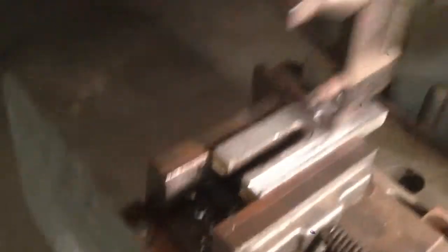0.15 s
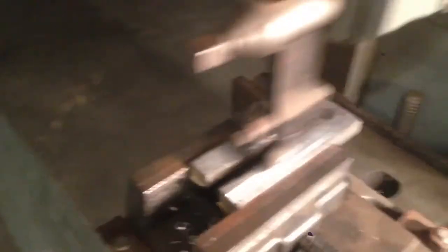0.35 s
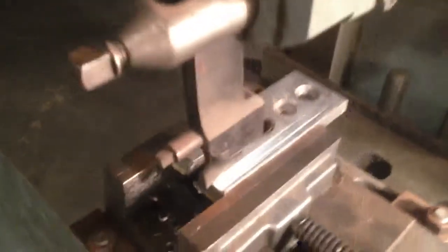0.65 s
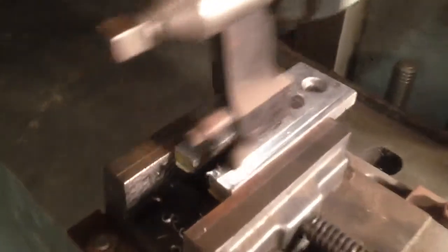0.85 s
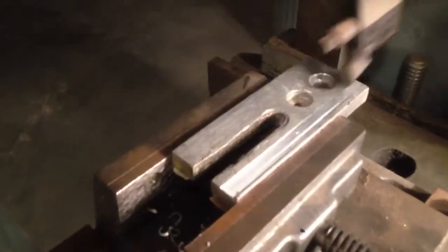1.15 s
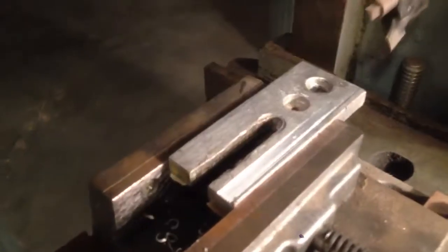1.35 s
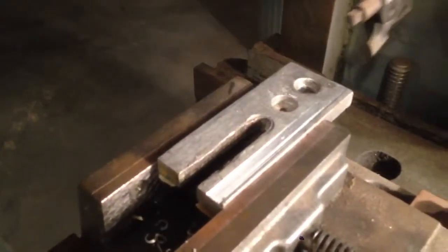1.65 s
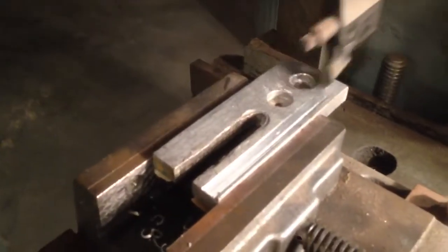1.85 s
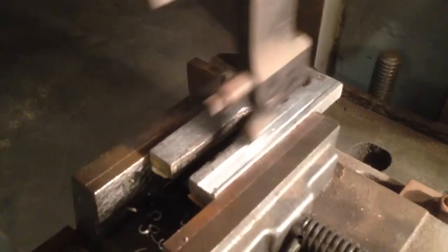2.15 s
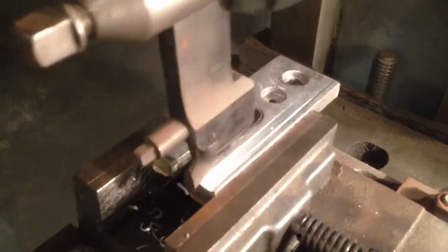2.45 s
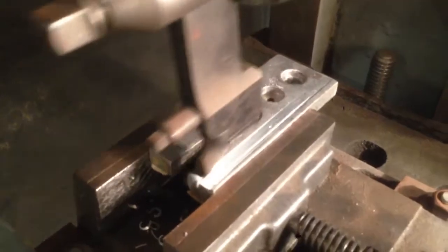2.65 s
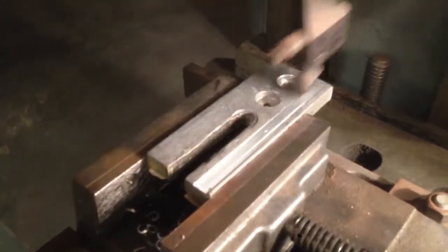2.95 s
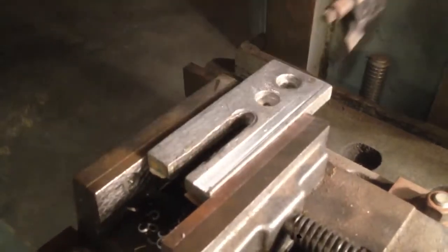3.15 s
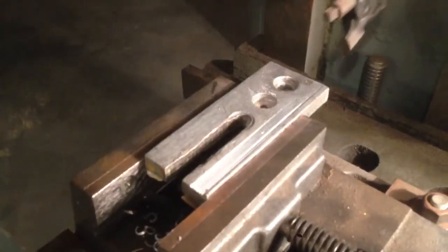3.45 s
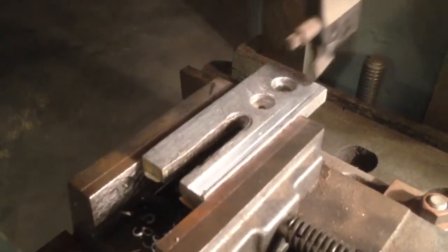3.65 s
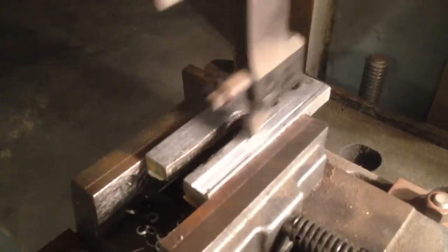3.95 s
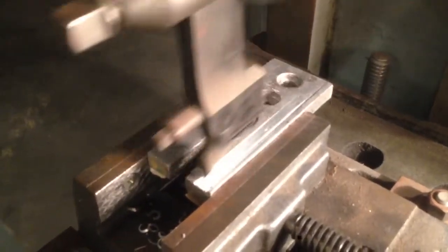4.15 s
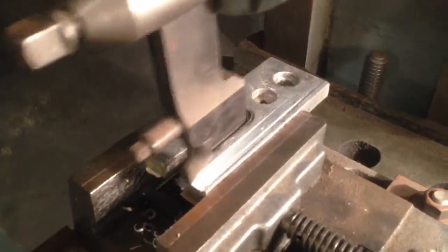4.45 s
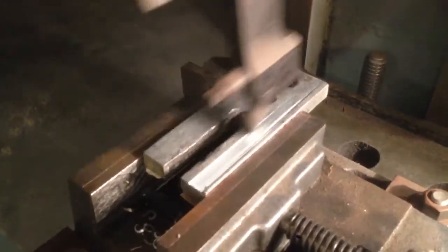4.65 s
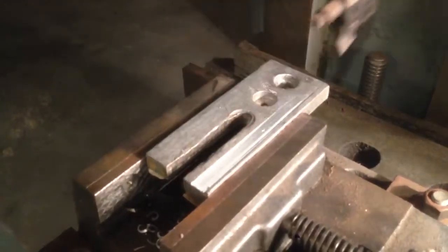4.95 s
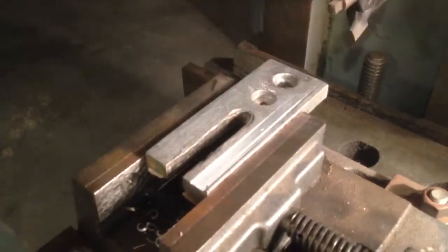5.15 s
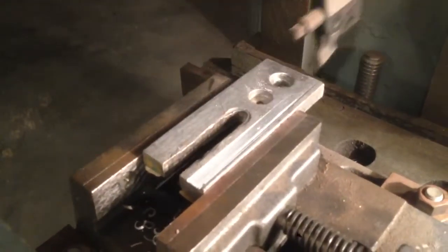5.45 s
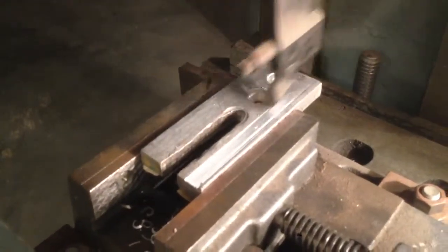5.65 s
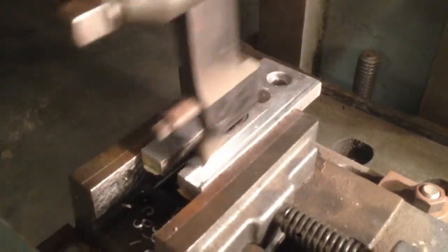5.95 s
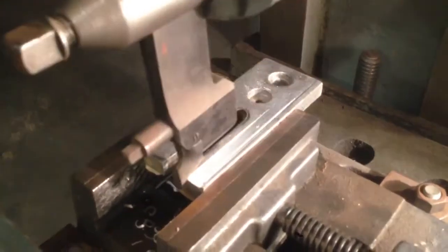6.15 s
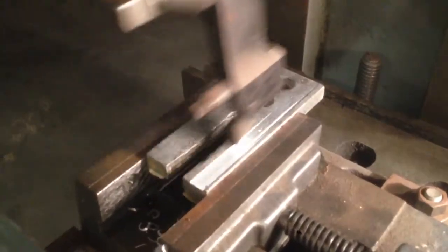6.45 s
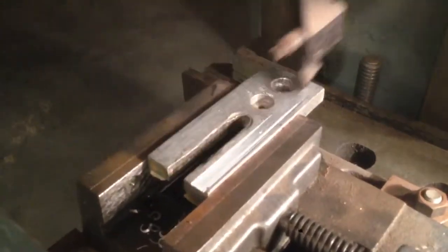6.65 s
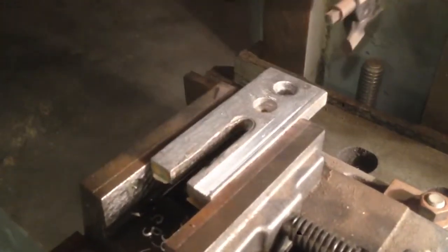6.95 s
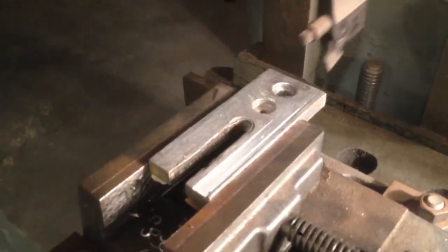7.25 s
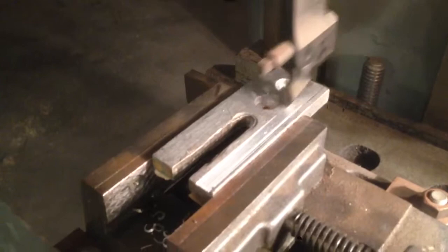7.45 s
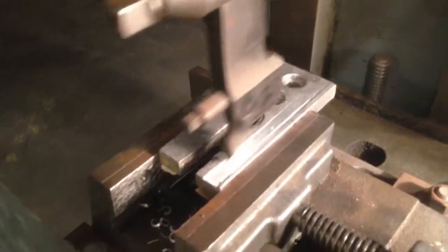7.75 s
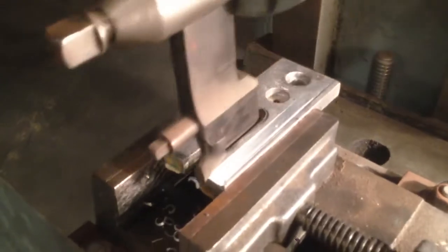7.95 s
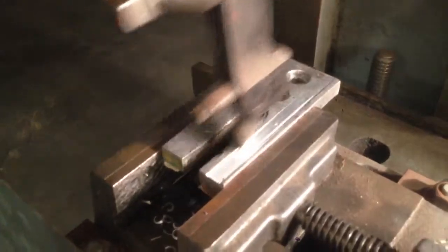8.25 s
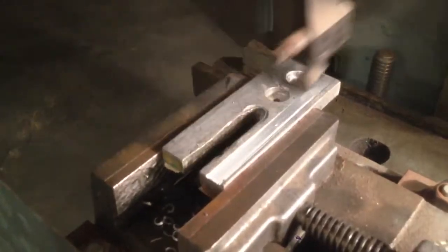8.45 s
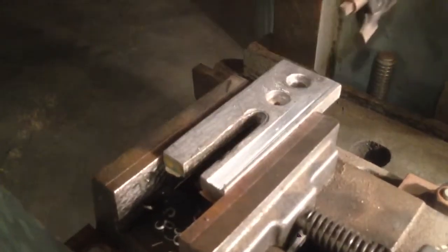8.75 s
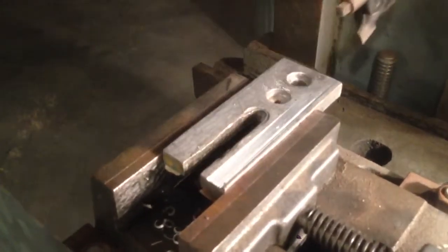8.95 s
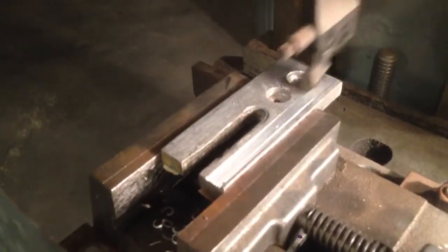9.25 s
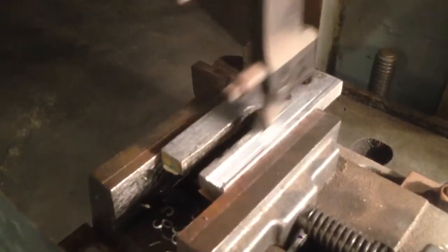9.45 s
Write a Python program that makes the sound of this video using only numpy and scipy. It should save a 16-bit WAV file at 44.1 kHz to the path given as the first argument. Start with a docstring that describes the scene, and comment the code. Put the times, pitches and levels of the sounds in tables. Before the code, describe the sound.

Close to a small metal shaper in a workshop, a motor whirs faintly beneath uneven gear rumble. Every stroke, just under two seconds, begins with a hard bright clack; a second clack follows quickly with a low thud as the tool bites. The cut grates and sings briefly, the tool springs free, then the ram slides back with a soft hiss and loose metallic knocks. Short room echoes follow the blows.

```python
"""A small metal shaper strokes to and fro in a workshop, over motor hum and gear rumble in filtered noise.
Each stroke opens with a clack of the feed pawl, made of struck modes; the linkage knocks and the slides hiss.
The tool bites with a low modal thud and sings through the cut in resonant noise while the pawl clacks again.
It springs free and drags back with a hiss of noise, while slack in the linkage knocks the cast frame.
Now and then gears thump, loose parts knock and chips tick; sparse echoes of the shop follow the blows."""
import sys
import numpy as np
from scipy import signal
from scipy.io import wavfile
from scipy.ndimage import uniform_filter1d

SR = 44100
rng = np.random.default_rng(int(sys.argv[2]) if len(sys.argv) > 2 else 0)


def wrap_up_sound(samples):
    """Save the sound to the file named by the first command line argument, as 16-bit audio."""
    columns = np.atleast_2d(samples).T
    # keep every value between -1 and 1, then stretch to whole-number steps
    tamed = np.clip(columns, -1, 1)
    steps = np.round(tamed * 32767).astype(np.int16)
    wavfile.write(sys.argv[1], SR, steps)


N = 422919
STROKE_S, FIRST_S = 1.8374, .0805  # one turn of the crank; start of the first forward stroke


def amp(db):
    """Level in decibels to amplitude ratio."""
    return 10 ** (np.asarray(db) / 20)


def evened(x):
    """Normalisation to unit rms."""
    return x / np.sqrt(np.mean(x ** 2) + 1e-20)


def read(points, hz):
    """Interpolation along a logarithmic frequency axis."""
    f, value = np.transpose(points)
    return np.interp(np.log(hz + 1), np.log(f + 1), value)


def band(x, lo_hz, hi_hz):
    """Band-pass filtering by a Butterworth response."""
    edges = [lo_hz, min(hi_hz, SR / 2 - 1000)]
    return signal.sosfilt(signal.butter(2, edges, "band", fs=SR, output="sos"), x)


def add(mix, s, sound):
    """Superposition of a sound upon the mix from time s."""
    part = mix[round(s * SR):][:len(sound)]
    part += sound[:len(part)]


def ring(modes, rise=0.000093):
    """Modal decay: dying sines of a struck part, neighbours in opposite sense, peak 1."""
    t = np.arange(4000) / SR
    out = 0
    for k, (hz, db, t60) in enumerate(modes):
        out = out + (-1) ** k * amp(db - 60 * t / t60) * np.sin(2 * np.pi * hz * t)
    out = out * (1 - np.exp(-t / rise))
    return out / abs(out).max()


def humps(peaks, hz):
    """Energy sum of resonance curves, in dB."""
    return 10 * np.log10(sum(amp(2 * db) / (1 + (2 * (hz - f) / w) ** 2) for f, w, db in peaks))


def noise(shape_db, patchy_db, size=1024, count=513):
    """Spectral shaping: random bins (the lowest count) follow shape_db(Hz) in drifting patches, rms 1."""
    hz = np.fft.rfftfreq(size, 1 / SR)[:count]
    a, b, patches = rng.standard_normal((4 * N // size + 5, count, 3)).T
    patches = uniform_filter1d(patches, size=6, axis=0)
    patches = evened(uniform_filter1d(patches, size=5, axis=1))
    z = (a + 1j * b) * amp(shape_db(hz)[:, None] + patchy_db * patches)
    z = np.pad(z, ((0, size // 2 + 1 - count), (0, 0)))
    return evened(signal.istft(z, nperseg=size, noverlap=3 * size // 4)[1][:N])


def wander(db, size):
    """Random amplitude modulation: smoothed noise as a gain, db being its rms swing."""
    return amp(db * evened(uniform_filter1d(rng.standard_normal(N), size=size)))


def into_stroke():
    """Periodic motion of the crank: seconds since the current stroke began."""
    return (np.arange(N) / SR - FIRST_S) % STROKE_S


def strokes(tables, edge_s):
    """Periodic gating: the gain follows each table in every stroke, off between them, with soft edges."""
    t = into_stroke()
    gain = 0
    for rows in tables:
        inside = (t > rows[0][0]) * (t < rows[-1][0])
        gain = gain + amp(np.interp(t, *np.transpose(rows))) * inside
    return uniform_filter1d(gain, size=round(edge_s * SR) + 1, mode="nearest")


def motor():
    """Tonal hum and broadband flow noise: mains hum that barely wavers, over the whir of fan and belt."""
    # mains hum: f/Hz, relative level/dB
    hum_lines = [(120.1, -68.5)]
    # spectrum of the whir: f/Hz, relative level/dB per Hz
    air_spectrum = [(290, -46), (500, 3.5), (648, -22), (717, 5), (770, -12), (942, -16), (1090, -4.5),
                    (1310, -7), (1990, -25), (3590, -17), (15600, -23)]
    t = np.arange(N) / SR
    hum = sum(amp(db + 2.5) * np.sin(2 * np.pi * hz * t) for hz, db in hum_lines)
    whir = amp(-61.5) * noise(lambda hz: read(air_spectrum, hz), 0.64)
    return wander(0.97, 3000) * hum + whir


def running_gear():
    """Load-modulated noise: gear rumble, the ringing gear case and the rustling slides follow the stroke."""
    # one stroke, forward and back: t/s into it, gear rumble/dB, ringing of the gear case/dB, slide rustle/dB
    stroke_levels = [(0, -61, -54.5, -68), (.05, -61, -53.5, -53), (.13, -58.5, -60, -55.5),
                     (.2, -58, -60, -56.5), (.23, -58, -48, -51), (.33, -56.5, -51, -56.5),
                     (.4, -56.5, -54.5, -54), (.52, -54, -49.5, -58), (.59, -56.5, -55.5, -63.5),
                     (.65, -57.5, -53.5, -64.5), (.8, -57, -50.5, -58), (.9, -58, -60, -61),
                     (1.13, -58.5, -59, -66), (1.17, -58.5, -48.5, -58), (1.23, -56.5, -56.5, -67),
                     (1.36, -61, -54.5, -64.5), (1.47, -64, -55, -66), (1.52, -61.5, -50, -56),
                     (1.6, -57, -53, -62), (1.67, -61.5, -59, -65.5), (1.8, -61, -61, -64.5)]
    # gear spectrum: f/Hz, relative level/dB per Hz
    gear_spectrum = [(30, -46), (80, -49), (135, -8), (190, -0.5), (240, -2.5), (310, -1), (400, -21.5),
                     (560, -9.5), (740, -8.5), (1000, -16.5), (1500, -46)]
    # gear case resonances: f/Hz, width/Hz, relative level/dB, before the sharpening below
    case_modes = [(397, 27, 0.5), (328.3, 61, -3.5), (456, 110, -4)]
    # slide spectrum: f/Hz, relative level/dB per Hz
    slide_spectrum = [(820, -8.5), (1400, -5.5), (1700, 1), (1810, -1.5), (1950, -2.5), (2220, -4),
                      (2420, -5.5), (2840, -5.5), (3090, -9.5), (3530, -7), (4350, -11.5), (5030, -18),
                      (6000, -18), (7800, -58), (13200, -120)]
    s, *levels = np.transpose(stroke_levels)
    gear, case, slide = (amp(np.interp(into_stroke(), s, db, period=STROKE_S)) for db in levels)
    teeth = wander(2.3, 900)  # uneven load, tooth by tooth
    surge = wander(2, 3500)  # the gear case swells unevenly
    rumble = noise(lambda hz: read(gear_spectrum, hz), 1.8, size=2048, count=90)
    ringing = noise(lambda hz: 2 * humps(case_modes, hz), 0.99, size=2048, count=60)
    rustle = noise(lambda hz: read(slide_spectrum, hz), 3.0, count=200)
    return gear * teeth * rumble + case * teeth * surge * ringing + slide * teeth ** 0.74 * rustle


def pawl():
    """Impact excitation: scrape, tick of slip-off, landing in two contacts, rebound; apart, gritty crack."""
    # feed pawl: t/s of the tick, bright tick level/dB, blow level/dB
    clack_times = [(0.08, -19.5, -13), (0.368, -22, -12.5), (1.9177, -19.5, -10.5), (2.2047, -18, -11),
                   (3.7524, -18, -12), (4.0387, -18, -12), (5.5921, -18, -11), (5.881, -16.5, -11.5),
                   (7.4268, -16, -10.5), (7.7122, -17.5, -12), (9.2694, -17, -11.5), (9.5537, -17.5, -12)]
    # modes struck by the blow: f/Hz, relative level/dB, t60/s
    pawl_modes = [(796, -15, 0.04), (1020, -12, 0.07), (1340, -7.5, 0.023), (1729, -9, 0.052),
                  (1920, -17.5, 0.068), (2370, -6.5, 0.029), (2757, -0.5, 0.027), (2853, -6.5, 0.051),
                  (3498, 10, 0.012), (3697, -0.5, 0.012), (4020, 1, 0.0076), (4694, 0, 0.021),
                  (5680, -11, 0.008), (5950, 7, 0.0099), (6560, -4, 0.0093), (7140, 2, 0.0049),
                  (8550, -25, 0.012), (9675, -29, 0.0077), (10800, -14, 0.005)]
    # modes of the bright tick: f/Hz, relative level/dB, t60/s
    tick_modes = [(6900, -9, 0.024), (8650, 1, 0.0086), (10120, 3, 0.0075), (11020, 5.5, 0.011),
                  (11750, 4, 0.0052), (12300, 5, 0.0082), (15050, 1, 0.0066)]
    land_s, rebound_db, spread_db = .0027, -18, 2.
    out, grit = np.zeros((2, N))
    tick = ring(tick_modes)[:1500]
    t = np.arange(1500) / SR
    for s, tick_db, blow_db in clack_times:
        # each blow excites the modes a little differently
        uneven = spread_db * rng.standard_normal(len(pawl_modes))
        body = ring([(hz, db + u, t60) for (hz, db, t60), u in zip(pawl_modes, uneven)], rise=0.00073)
        scrape, fizz, crack = rng.standard_normal((3, 1500))
        scrape = band(scrape, 1500, 3300) * amp(-60 * t / 0.079)
        fizz = band(fizz, 2200, 19500) * amp(-60 * t / 0.015)
        crack = band(crack, 620, 12500) * amp(-60 * t / 0.031)
        landing = s + land_s
        add(out, s - .009, amp(blow_db - 27.5) * scrape)
        add(out, s, amp(tick_db) * (tick + 0.34 * fizz))
        add(out, landing, amp(blow_db) * body)
        add(out, landing + .0016, amp(blow_db - 6.5) * body)
        add(grit, landing, amp(blow_db - 8.0) * crack)
        add(out, landing + 0.0056, amp(blow_db + rebound_db) * body)
    return out, grit


def all_knocks():
    """Take-up of slack: linkage knocks, uneven in strength, the tool springing free, then loose parts."""
    # linkage, at the same places of every stroke: t/s into the stroke, relative level/dB, low part/dB,
    # treble part/dB, nominal rattle t60/s, loose part f/Hz, its relative share/dB, rise/s
    linkage_slack = [(.045, -41, -7, -24, .11, 1896, 10.5, .014),
                     (.683, -49.5, 1.5, -18, 0.16, 1810, -5, 0.0028),
                     (.7385, -28.5, -8, -7, 0.07, 3000, 4, .009), (.768, -43, 2, -2, 0.076, 1850, 2, .007),
                     (.806, -47.5, 5.5, -1.5, 0.073, 1700, -2, .0026),
                     (1.165, -52, 6, -4, 0.066, 1700, -4, .006),
                     (1.5025, -43, -1.5, -21, 0.083, 3030, 8.5, 0.00202),
                     (1.537, -48, -1.5, -0.5, 0.058, 1750, 12, .004),
                     (1.577, -51.5, -2.5, -4.5, 0.14, 1850, 0, 0.0034)]
    # the tool springs free at the end of the cut: t/s, relative level/dB
    snap_times = [(0.5946, -34), (2.432, -36.5), (4.269, -39), (6.106, -38), (7.941, -51.5)]
    # its colour: low part/dB, treble part/dB, nominal rattle t60/s, loose part f/Hz, relative share/dB, rise/s
    snap_colour = (1.6, 1.6, 0.027, 7770, 4, .0006)
    # loose parts knock now and then: t/s, relative level/dB, loose part f/Hz
    loose_knocks = [(0.6483, -47.5, 1860), (1.227, -44.5, 1840), (2.552, -51, 2340), (2.6995, -48, 1880),
                    (2.835, -56, 1860), (2.9945, -46, 1860), (3.212, -51, 1870), (3.5359, -50, 2080),
                    (4.6736, -50, 2720), (4.8995, -54, 1920), (5.1107, -49, 1820), (5.3327, -43.5, 1690),
                    (6.2053, -47, 1870), (6.9117, -55.5, 1690), (8.2133, -41.5, 1870), (8.551, -51.5, 1820),
                    (8.5991, -44.5, 1900), (8.761, -45, 1860)]
    low_db, treble_db, t60_s, part_db, rise_s = -2.5, -5.5, 0.055, 9.5, .0026
    rows = []
    for start in np.arange(FIRST_S, N / SR, STROKE_S):
        for s, db, *colour in linkage_slack:
            rows.append((start + s, db + .8 * rng.standard_normal(), *colour))
    rows += [(s, db, *snap_colour) for s, db in snap_times]
    return rows + [(s, db, low_db, treble_db, t60_s, hz, part_db, rise_s) for s, db, hz in loose_knocks]


def knocks(rows):
    """Source and resonator: uneven rattling of slack rings one loose part and the cast frame in three ranges."""
    # cast frame resonances: f/Hz, width/Hz, relative level/dB
    frame_modes = [(690, 164, 9.5), (1219, 84, 0.5), (1723, 390, 4.5), (2200, 233, -0.5), (2760, 430, 3.5),
                   (3370, 295, 0), (3950, 370, -0.5), (4890, 690, 0), (6000, 780, 3), (7370, 1550, 4),
                   (8830, 1060, 0), (11600, 2100, 2), (13600, 2100, 4)]
    drive, out, t = np.zeros((3, N)), np.zeros(N), np.arange(4000) / SR
    for s, db, low_db, treble_db, t60, hz, part_db, rise in rows:
        rise = max(rise, .0005)
        start = s - .6 * rise
        grit, bumps = rng.standard_normal((2, 4, len(t)))
        clumps = amp(1.36 * evened(uniform_filter1d(bumps, size=90)))  # contacts come in clumps
        grit = grit * clumps * np.minimum(t / rise, 1)
        for k, range_db in enumerate((low_db, 0, treble_db)):
            range_t60 = max(t60 * 0.69 ** (k - 1), .005)  # treble dies first
            add(drive[k], start, amp(db + range_db - 60 * t / range_t60) * grit[k])
        loose = band(grit[-1] * amp(-60 * t / max(t60, .005)), hz * .95, hz * 1.05)
        add(out, start, amp(db + part_db + 8.5) * loose)
    for k, (lo, hi) in enumerate(((0, 1500), (1500, 5000), (5000, SR))):
        body = ring([(f, db, 1.6 / w) for f, w, db in frame_modes if lo < f < hi])
        out += signal.oaconvolve(drive[k], body / np.linalg.norm(body))[:N]
    return out


def drag():
    """Friction noise: tool and slides hiss, forward then back."""
    # hiss, one list a pass: t/s into the stroke, level/dB
    drag_levels = [
        [(.09, -64), (.38, -59.5), (.515, -68.5)],
        [(.78, -62.5), (.93, -61), (1.065, -63.5)],
    ]
    # hiss spectrum: f/Hz, relative level/dB per Hz
    drag_spectrum = [(2650, -47), (4500, -10), (4890, -5), (5100, -13), (5890, -5.5), (7550, 1),
                     (10500, -7), (14500, -15), (15500, -24)]
    return strokes(drag_levels, 0.023) * noise(lambda hz: read(drag_spectrum, hz), 0.73, count=370)


def cut():
    """Resonance under random forcing: the cut sings as the chip tears unevenly."""
    # the cut: t/s into the stroke, level/dB
    cut_levels = [
        [(.12, -71), (.22, -46.5), (.38, -46), (.52, -48)],
    ]
    # cut resonances: f/Hz, width/Hz, relative level/dB, before the sharpening below
    cut_modes = [(647, 74, -7.5), (744, 48, -2.5), (923, 80, -3), (1123, 70, -4.5), (1201, 105, 0),
                 (1290, 80, -10), (1553, 69, -6.5), (2430, 180, -8.5)]
    tearing = wander(2.5, 300)
    singing = noise(lambda hz: 1.73 * humps(cut_modes, hz), 3.2, size=2048, count=220)
    return strokes(cut_levels, 0.0085) * tearing * singing


def thuds():
    """Impulsive loading of low modes: a soft double push as the tool bites or the gears thump."""
    # the tool bites into the metal: t/s, relative level/dB, main mode f/Hz
    bite_times = [(0.302, -23.5, 697), (2.138, -23, 710), (3.972, -24.5, 660), (5.815, -23.5, 711),
                  (7.653, -28.5, 720), (9.489, -24, 700)]
    # gear thumps: t/s, relative level/dB, main mode f/Hz
    thump_times = [(0.551, -30.5, 375), (0.606, -33, 392), (1.6, -35, 400), (1.68, -43, 400),
                   (2.727, -31.5, 310), (3.085, -43, 401), (4.22, -38, 400), (4.524, -36, 432),
                   (4.94, -40.5, 419), (6.405, -32, 377), (7.02, -40, 400)]
    out = np.zeros(N)
    for rows, t60 in ((bite_times, 0.035), (thump_times, 0.04)):
        for s, db, hz in rows:
            modes = [(hz * 0.598, -8, t60), (hz * 0.882, -4, t60 * 1.3),
                     (hz, 0, t60), (hz * 1.184, -5, t60 * 0.49)]
            push = ring(modes, rise=0.00096)
            add(out, s - .004, amp(db - 11.5) * push)
            add(out, s + 0.002, amp(db - 1.0) * push)
    return out


def groan():
    """Narrow-band resonance: the bed groans under the load late in the cut and at the turn."""
    # groans, one list each: t/s into the stroke, level/dB
    groan_levels = [
        [(.28, -64), (.45, -61), (.53, -54), (.62, -69)],
        [(.79, -56), (.83, -60.5), (.92, -75)],
    ]
    # bed resonance: f/Hz, width/Hz, relative level/dB, before the sharpening below
    bed_modes = [(188.8, 15, 0)]
    bed = noise(lambda hz: 2 * humps(bed_modes, hz), 1.4, size=4096, count=40)
    return strokes(groan_levels, 0.014) * bed


def holder():
    """Free vibration of one mode: the tool holder rings as the tool springs free or catches."""
    # rings: t/s, relative level/dB
    ring_times = [(0.5942, -41), (0.8882, -33), (2.433, -28), (2.724, -44), (4.2692, -36.5), (4.561, -43),
                  (6.107, -28.5), (7.942, -35)]
    holder_hz, holder_t60_s = 1172, 0.091
    out = np.zeros(N)
    for s, db in ring_times:
        add(out, s, amp(db - 3.0) * ring([(holder_hz, 0, holder_t60_s)], rise=0.00052))
    return out


def chips():
    """Transient wide-band bursts: chips tick as they drop or break off."""
    # chips: t/s, level/dB, centre f/Hz
    chip_times = [(2.36, -44, 14500), (2.3755, -40, 13500), (5.348, -46, 5000), (5.481, -52, 4770),
                  (6.2949, -40.5, 5000), (7.679, -41, 4200), (7.891, -40.5, 8000)]
    out, t = np.zeros(N), np.arange(600) / SR
    for s, db, hz in chip_times:
        burst = evened(band(rng.standard_normal(len(t)), hz * 0.74, hz * 1.4))
        add(out, s, amp(db - 60 * t / 0.0077) * burst)
    return out


def shop(x):
    """Reverberation: sparse taps of random sign, each band with its own decay, in a tail that keeps shifting."""
    # reverberation of the shop: f/Hz, t60/s
    shop_decay = [(300, 0.49), (1300, 0.57), (3500, 0.21), (9000, 0.19), (15000, 0.21)]
    out, at = np.zeros(N), np.arange(300, SR // 2 - 20, 20)
    for k in range(3):
        taps = np.zeros(SR // 2)
        taps[at + rng.integers(0, 20, len(at))] = rng.choice([-1., 1.], len(at))
        hz, t, z = signal.stft(taps, SR, nperseg=256)
        decay = amp(-60 * t / read(shop_decay, hz)[:, None])
        tail = signal.istft(z * decay, SR, nperseg=256)[1]
        # three sets of echoes take turns, 7.3 cycles a second
        share = np.sqrt(2 / 3) * np.cos(2 * np.pi * (7.3 * np.arange(N) / SR + k / 3))
        out += signal.fftconvolve(x * share, tail / np.linalg.norm(tail))[:N]
    return out


def scene():
    """Superposition of direct sounds, and of the echoes that the impacts excite."""
    rung, cracked = (band(part, 470, 14400) for part in pawl())
    linkage = band(knocks(all_knocks()), 420, 13600)
    low = band(thuds() + holder(), 140, 2800)
    cracked = cracked + chips()
    echoes = shop(amp(-19.5) * rung + amp(-10) * cracked + amp(-18) * low + amp(-13) * linkage)
    impacts = rung + cracked + low + linkage
    steady = motor() + running_gear() + drag() + cut() + groan()
    return (impacts + echoes + steady)[None]


def record(dry):
    """Band limitation: the small microphone loses the deep bass, the recorder the extreme treble."""
    mic_hz, edge_hz = 106, 15350
    thin = signal.sosfilt(signal.butter(2, mic_hz, "high", fs=SR, output="sos"), dry)
    limit = signal.firwin(255, edge_hz, window=("kaiser", 7), fs=SR)
    return signal.oaconvolve(thin, limit[None], "same")


dry = scene()
out = record(dry)
wrap_up_sound(out)
```